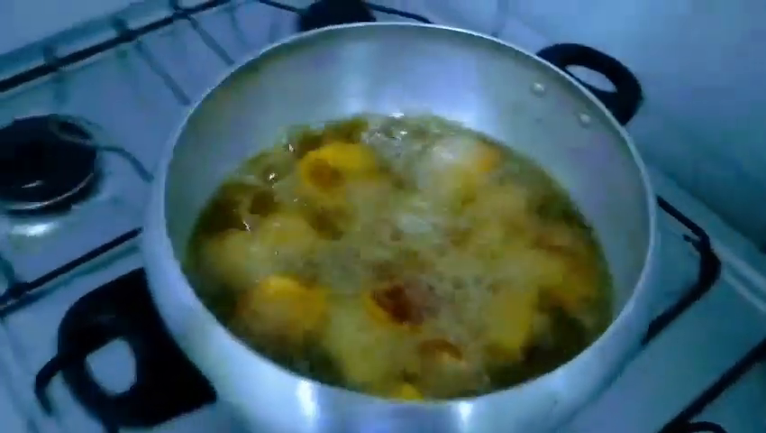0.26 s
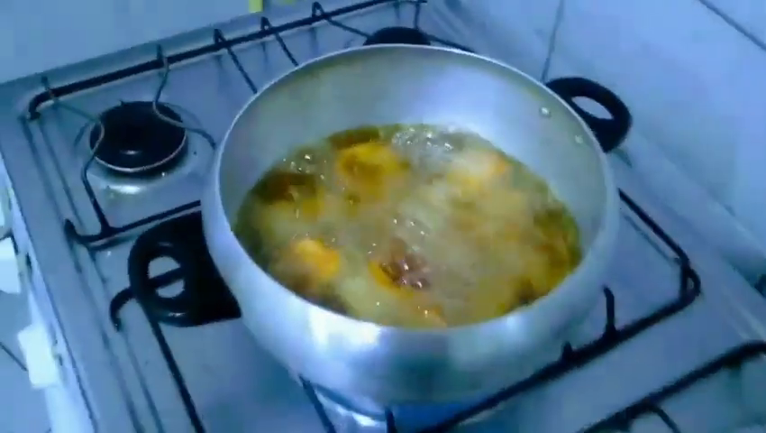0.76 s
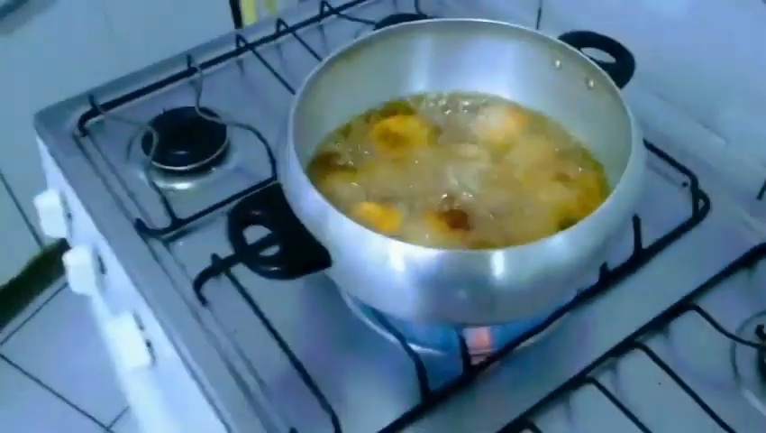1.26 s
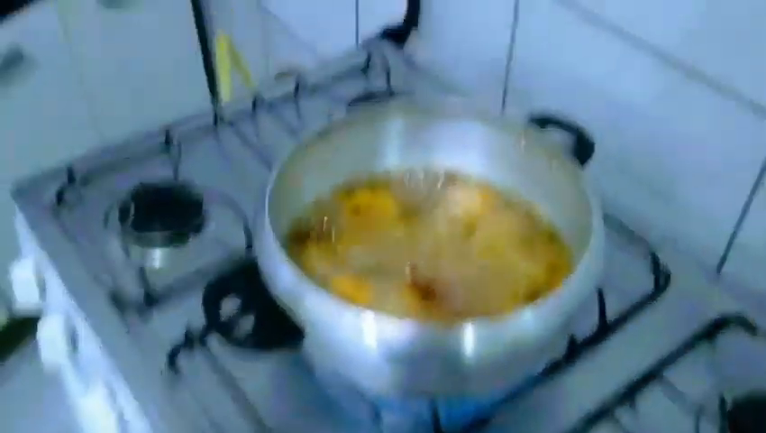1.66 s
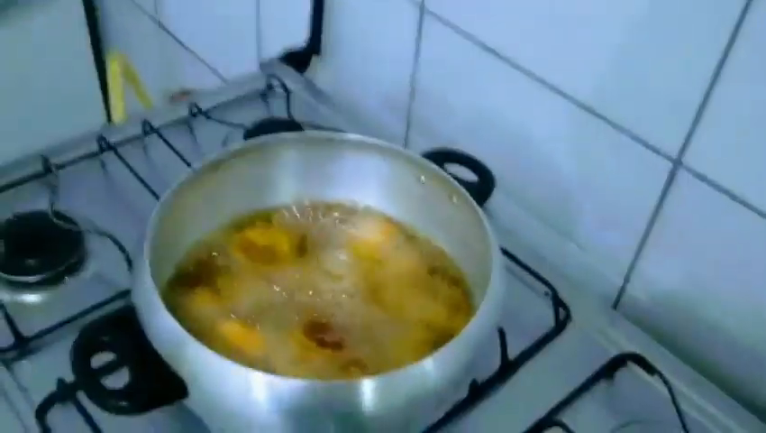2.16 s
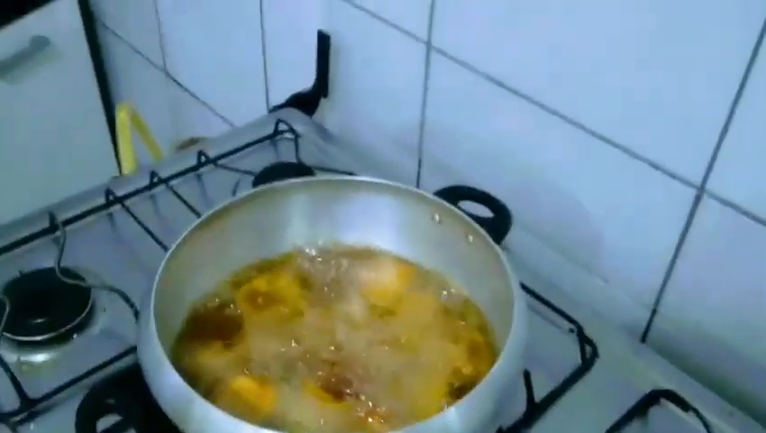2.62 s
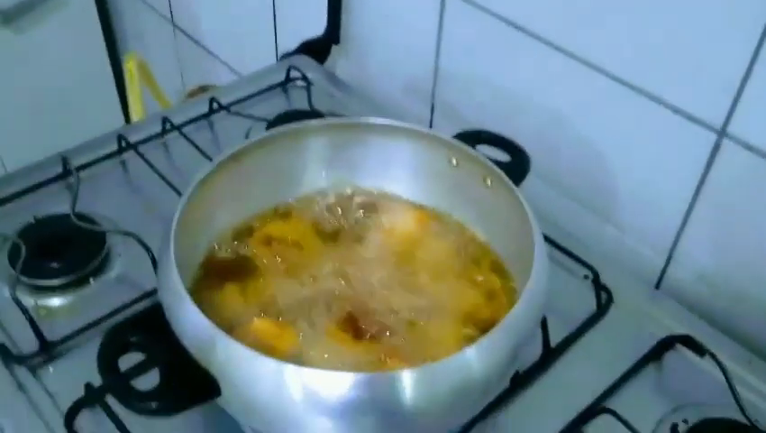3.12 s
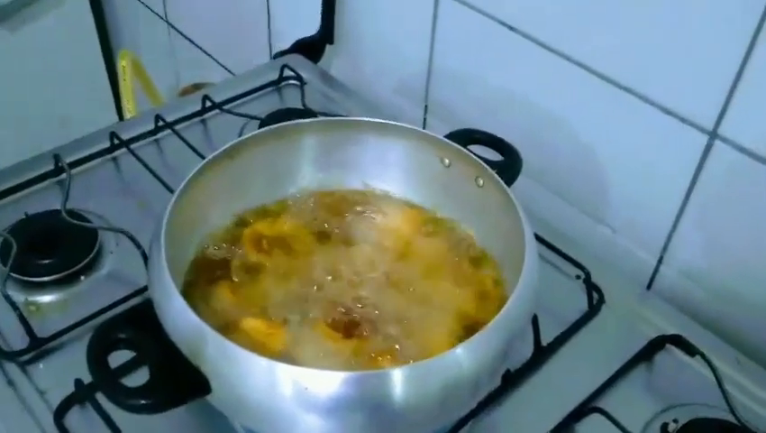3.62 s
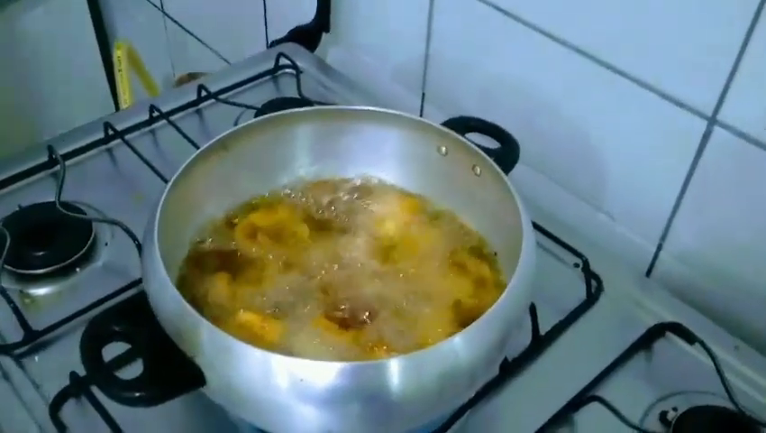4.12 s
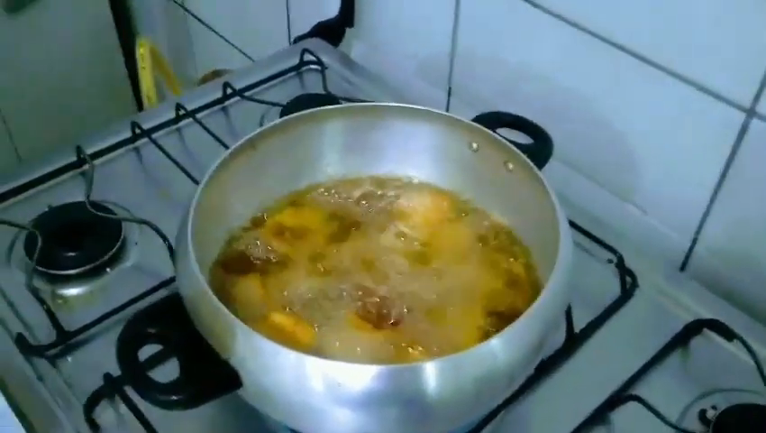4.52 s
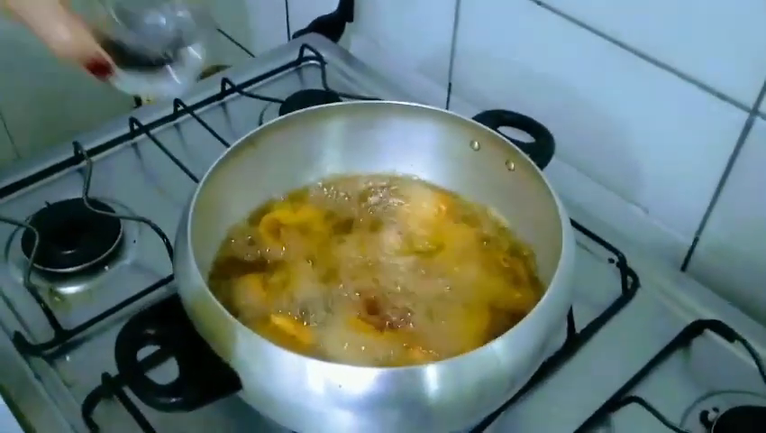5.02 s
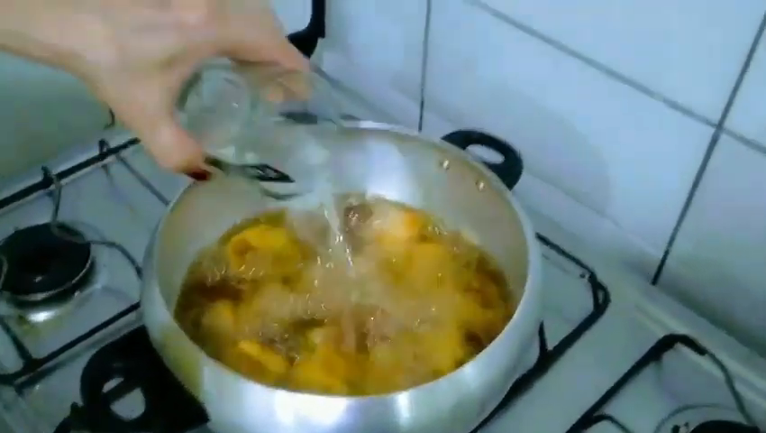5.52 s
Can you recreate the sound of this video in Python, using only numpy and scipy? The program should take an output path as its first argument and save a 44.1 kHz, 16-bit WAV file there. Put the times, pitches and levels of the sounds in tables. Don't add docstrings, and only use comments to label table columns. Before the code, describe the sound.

A wide metal pot of hot oil sizzles continuously: dense bright fizz, scattered sharp pops and low hollow gurgles. A small metal jingle and handling bumps come at the start, then a short wavering hum from a steam pocket. Bubbling is busiest early and thins later, before poured water hisses at the end. Tiled kitchen, handheld phone, wide stereo.

```python
import sys
import numpy as np
from scipy import signal
from scipy.fft import rfft, irfft, next_fast_len
from scipy.io import wavfile
from scipy.ndimage import map_coordinates

SR = 44100
rng = np.random.default_rng(int(sys.argv[2]) if len(sys.argv) > 2 else 0)


def store_wav(level_fs):
    pcm = np.round(np.clip(np.atleast_2d(level_fs), -1, 1) * 32767)
    wavfile.write(sys.argv[1], SR, pcm.T.astype(np.int16))


def makeup_ratio(level_db):
    decades = np.asarray(level_db, float) / 20
    return 10 ** decades


N = 254592


def unit(x):
    return x / np.sqrt(np.mean(x ** 2) + 1e-20)


def along(points, hz):
    f, v = np.transpose(points)
    return np.interp(np.log(hz + 1), np.log(f + 1), v)


def curves(rows):
    s, *cols = np.transpose(rows)
    return [np.interp(np.arange(N) / SR, s, c) for c in cols]


def wobble(rate):
    knots = rng.standard_normal(int(N * rate / SR) + 4)
    return map_coordinates(knots, [np.arange(N) * rate / SR])


def filtered(x, response):
    m = next_fast_len(N + 8192)
    return irfft(rfft(x, m) * response(np.fft.rfftfreq(m, 1 / SR)), m)[..., :N]


def coloured(x, colour):
    return unit(filtered(x, lambda hz: makeup_ratio(along(colour, hz))))


# f/Hz, likeness [-1 to 1]
PORT_LIKENESS = [(100, 0.64), (300, 0.8), (700, 0), (1300, 0.91), (1900, 0), (4000, -.15)]


def rush():
    def mid_and_side(hz):
        turn = np.arccos(np.clip(along(PORT_LIKENESS, hz), -1, 1)) / 2
        return np.array([np.cos(turn), np.sin(turn)])
    mid, side = filtered(rng.standard_normal((2, N)), mid_and_side)
    return np.array([mid + side, mid - side])


def bursts(s, gain, hz, t60, lag, size, rise=0.12):
    snap = 0.04
    start = (s * SR).astype(int)
    places = (start[:, None] + np.arange(size + 16)).ravel()
    out = []
    for shift in (lag / 2, -lag / 2):
        t = np.maximum(np.arange(-16, size) / SR - shift[:, None], 0)
        u = t / t60[:, None]
        wave = np.sin(2 * np.pi * hz[:, None] * t * (1 + rise * np.minimum(u, 1)))
        wave *= gain[:, None] * makeup_ratio(-60 * u) * (1 - np.exp(-u / snap))
        out.append(np.bincount(places, wave.ravel(), N + size + 16)[16:N + 16])
    return np.array(out)


def swarm(count, hz, spread, turns, scatter_db, size):
    s, e, place = rng.random((3, count))
    pitch = hz * np.exp(spread * rng.standard_normal(count))
    gain = makeup_ratio(-scatter_db * np.log(1 - .985 * e))
    lag = 0.00028 * place - 5e-5
    return unit(bursts(s * N / SR, gain, pitch, turns / pitch, lag, size=size))


# f/Hz, level/dB rms
DRONE_TONES = [(146, -80), (205, -76.5), (240, -67)]
# t/s, level/dB
HAND_SHIFTS = [
    (0.0, -45.5),
    (0.47, -40),
    (5.55, -63),
]


def rumble():
    rest_db, fade_db_per_s, touch_s = -83, 136, 0.042
    lull_db, case_deep = 4, 0.04
    t = np.arange(N) / SR
    drone = 0
    for hz, db in DRONE_TONES:
        drone = drone + makeup_ratio(db - 1.0 + 2.5 * wobble(8.3)) * np.sin(2 * np.pi * hz * t + 1.6 * wobble(10))
    grip = makeup_ratio(rest_db + lull_db * wobble(6.03))
    for s, db in HAND_SHIFTS:
        grip = grip + np.clip((t - s) / touch_s, 0, 1) * makeup_ratio(db - fade_db_per_s * np.abs(t - s))
    noise = rng.standard_normal((2, N))
    case = filtered(noise, lambda hz: (case_deep + (hz / 150) ** 5) / (1 + (hz / 165) ** 7))
    return drone + grip * unit(case + 0.037 * case[::-1])


# f/Hz, level/dB
HUM_SPECTRUM = [(25, -2), (120, -0.5), (250, 5), (500, -4.5), (1500, -29), (2500, -4), (4000, -40)]


def room_hum():
    return makeup_ratio(-58.0 + 2 * wobble(6.1)) * coloured(rush(), HUM_SPECTRUM)


# f/Hz, t60/s
TILE_DECAY = [(300, 0.65), (2000, 0.84), (10000, 0.016)]


def kitchen(x):
    hz, t, z = signal.stft(rng.standard_normal((2, SR // 3)), SR, nperseg=256)
    dying = makeup_ratio(-60 * t / along(TILE_DECAY, hz)[:, None])
    tail = signal.istft(z * dying, SR, nperseg=256)[1]
    late = np.pad(x, ((0, 0), (130, 0)))
    return signal.fftconvolve(late, tail / np.linalg.norm(tail[0]), axes=1)[:, :N]


# t/s, level/dB, lean/dB (odd mode groups gain it, the others lose it)
METAL_SHAKES = [
    (0, 1.5, 2.5),
    (.049, -2, 8.5),
    (0.104, 3.5, 7.5),
    (.165, -2, 1.5),
]
# f/Hz of each mode, strongest first
METAL_MODES = [
    [7763, 8150],
    [9760, 10212, 10616],
    [11698, 11816, 11190],
    [13840, 13969],
    [14756, 15294, 15450],
]
METAL_LEVELS = [-41.5, -51, -43, -55, -48]


def jingle():
    rattle = 0.011
    stop_s = 0.245
    t, out = np.arange(SR // 2) / SR, np.zeros((2, N))
    ends = [row[0] for row in METAL_SHAKES[1:]] + [stop_s]
    signs = (-1) ** np.arange(len(METAL_MODES))
    for (s, db, lean_db), end in zip(METAL_SHAKES, ends):
        age = np.maximum(t - s, 0)
        swell = makeup_ratio(-60 * age / .5 - np.clip((t - end) * 900, 0, 80)) * (1 - np.exp(-age / 0.0013))
        for level, modes in zip(db + np.array(METAL_LEVELS) - lean_db * signs, METAL_MODES):
            for k, hz in enumerate(modes):
                wander = rattle * np.cumsum(rng.standard_normal(len(t))) * (hz / 12000) ** 2
                phase = rng.random() + 0.15 * rng.random((2, 1)) + wander
                ring = np.sin(2 * np.pi * (hz * age + phase))
                out[:, :len(t)] += makeup_ratio(level + 6.0 - 19 * np.sqrt(k)) * swell * ring
    return out


# t/s, f/Hz, level/dB
POCKET_HUM = [
    (.39, 379, -56),
    (.41, 385, -43),
    (.455, 442, -35),
    (.53, 341.3, -47),
    (.62, 402.6, -38),
    (.65, 392, -53),
    (.7, 400.3, -33),
    (.85, 386.6, -49),
    (.93, 383.5, -36),
    (.97, 373, -59),
]


def pocket():
    hz, db = curves(POCKET_HUM)
    t = np.arange(N) / SR
    alive = (t > POCKET_HUM[0][0]) & (t < POCKET_HUM[-1][0])
    turns = np.cumsum(hz + 14 * wobble(39.98)) / SR
    return alive * makeup_ratio(db + 4.5 * wobble(25.7)) * np.sin(2 * np.pi * turns)


# t/s, level/dB rms, length/s
WET_SPOTS = [
    (0.727, -42, 0.016),
    (1.935, -34.5, 0.07),
    (2.16, -32, 0.024),
    (2.777, -37, 0.03),
    (3.391, -32, 0.12),
    (3.712, -33, 0.19),
    (4.022, -28, 0.046),
    (4.75, -33, 0.024),
    (5.346, -38, 0.099),
    (5.645, -42, .09),
]
# f/Hz, level/dB
SPATTER_SPECTRUM = [(250, -42), (500, -3), (1500, 2), (2250, 20), (4500, 19.5), (7000, 7), (12000, -4.5),
                    (16000, -26)]


def spatter():
    t, level = np.arange(N) / SR, 0
    for s, db, length in WET_SPOTS:
        fall_db = 77 * np.maximum(t - s - length, 0) + 56 * np.abs(t - s)
        level = level + (t > s) * makeup_ratio(db - fall_db)
    bubbles = swarm(count=9000, hz=3030, spread=0.68, turns=18.0, scatter_db=13.0, size=200)
    return level * coloured(0.15 * bubbles + 3.5 * rush(), SPATTER_SPECTRUM)


def opening(rows, shut_db):
    open_s, sag_db_per_s, close_db_per_s = 0.0033, 4, 355
    power = np.pad(makeup_ratio(shut_db) ** 2, (0, 2 * SR))
    for s, length, db in rows:
        age = np.arange(int((length + .2) * SR)) / SR
        fall_db = sag_db_per_s * age + close_db_per_s * np.maximum(age - length, 0)
        power[int(s * SR):][:len(age)] += (np.minimum(age / open_s, 1) * makeup_ratio(db - fall_db)) ** 2
    return np.sqrt(power[:N])


# low edge f/Hz, high edge f/Hz, make-up level/dB, shut level/dB
GATE_BANDS = [
    (279, 466, 1, -66),
    (577, 728, -5, -54.5),
    (740, 984, -7, -50.5),
    (1051, 1300, -7.5, -50),
    (1257, 3170, 6.5, -69.5),
]
# t/s, length/s, level/dB
DEEP_BOILS = [
    (0.022, 0.019, -40.5),
    (0.11, 0.12, -42),
    (0.41, 0.545, -41),
    (0.988, 0.096, -47.5),
    (1.288, 0.071, -47),
    (2.076, 0.21, -45.5),
    (2.428, 0.07, -49.5),
    (3.04, 0.017, -43.5),
    (4.016, 0.07, -48),
    (5.548, 0.016, -53),
]
LOW_BOILS = [(0.009, 0.056, -38.5), (0.121, 0.29, -38), (0.442, 0.18, -35.5), (0.96, 0.065, -34),
             (1.158, 0.02, -31), (1.496, 0.026, -43.5), (2.022, 0.13, -41.5), (2.244, 0.021, -38),
             (2.375, 0.073, -39), (2.562, 0.038, -39), (2.775, 0.042, -36.5), (2.865, 0.06, -41.5),
             (3.038, 0.02, -37), (3.224, 0.013, -38), (3.395, 0.072, -36), (3.541, 0.12, -39),
             (3.778, 0.032, -37.5), (4.035, 0.048, -39), (4.193, 0.039, -36.5), (4.565, 0.015, -40),
             (4.741, 0.034, -39), (4.99, 0.016, -39.5), (5.097, 0.048, -37.5), (5.209, 0.075, -46),
             (5.325, 0.077, -41), (5.545, 0.25, -40.5)]
MIDDLE_BOILS = [(0.103, 0.097, -37.5), (0.302, 0.042, -39), (0.51, 0.07, -36), (.74, 0.18, -43.5),
                (1.16, 0.077, -40.5), (1.356, 0.033, -34), (1.463, 0.089, -28), (1.714, 0.091, -31),
                (1.79, 0.11, -35), (1.976, 0.26, -32.5), (2.2, 0.034, -42), (2.374, 0.015, -40),
                (2.439, 0.019, -38), (2.541, 0.022, -36), (2.946, 0.014, -54), (3.395, 0.068, -37),
                (3.541, 0.025, -35), (4.04, 0.0083, -31), (4.84, 0.03, -38), (5.093, 0.045, -41),
                (5.197, 0.082, -37), (5.325, 0.066, -42), (5.423, 0.014, -33), (5.55, 0.23, -38),
                (2.78, .13, -45), (3.22, 0.024, -45), (4.5, 0.091, -40.5)]
HIGH_BOILS = [(0.049, 0.16, -37), (0.484, 0.23, -38.5), (0.743, 0.029, -33), (0.811, 0.17, -35),
              (0.975, 0.019, -26.5), (1.075, 0.079, -36.5), (1.166, 0.048, -33.5), (1.352, 0.86, -32),
              (1.712, 0.63, -35), (2.035, 0.17, -50), (2.264, 0.043, -37), (2.344, 0.14, -37),
              (2.697, 0.034, -35.5), (2.901, 0.021, -37), (3.039, 0.11, -39.5), (3.408, 0.013, -32),
              (3.52, 0.12, -36), (3.733, 0.14, -36.5), (4.076, 0.038, -36), (4.282, 0.17, -39),
              (4.809, 0.082, -46), (5.012, 0.011, -37), (5.098, 0.021, -32), (5.248, 0.037, -39),
              (5.329, 0.13, -37), (5.485, 0.34, -39), (2.6, 0.01, -34.5), (1.4, 0.081, -40),
              (4.56, 0.2, -45), (3.0, 0.018, -32.5), (4.8, 0.16, -33)]
MURMUR_BOILS = [(0.019, 0.29, -46), (0.297, 0.17, -54), (0.421, 0.29, -52.5), (0.748, 0.5, -53),
                (1.369, 0.059, -60), (1.507, 0.047, -46), (1.59, .7, -48.5), (2.38, 0.085, -51),
                (2.901, 0.037, -58), (3.033, 0.041, -51), (3.155, 0.026, -52.5), (3.518, 0.16, -57),
                (3.708, 0.086, -63), (4.017, 0.065, -48), (4.558, 0.055, -55), (4.837, 0.17, -54),
                (5.112, 0.017, -54), (5.497, 0.026, -40.5), (5.55, 0.3, -38.5)]


def boil():
    bubbles = swarm(count=2500, hz=883.4, spread=0.482, turns=30.3, scatter_db=1.5, size=1300)
    raw = 0.5 * bubbles + 1.43 * rush()
    shared_leak_db = 2 * wobble(8)
    boils = (DEEP_BOILS, LOW_BOILS, MIDDLE_BOILS, HIGH_BOILS, MURMUR_BOILS)
    out = 0
    for rows, (lo, hi, makeup_db, shut_db) in zip(boils, GATE_BANDS):
        band = filtered(raw, lambda hz: 1 / (1 + (lo / (hz + 1)) ** 24) / (1 + (hz / hi) ** 24))
        gate = opening(rows, shut_db + shared_leak_db + 1.2 * wobble(9.3))
        out = out + gate * makeup_ratio(makeup_db + 1.4 * wobble(16)) * unit(band)
    return out


# t/s, peak level/dB, f/Hz
GURGLE_BURSTS = [(0.141, -20, 920), (0.1809, -17, 750), (0.3108, -13.5, 757), (0.3318, -11, 1070),
                 (0.3849, -19, 740), (0.5189, -8, 1053), (0.5404, -18, 797), (0.563, -16, 1014),
                 (0.63, -12, 1207), (0.8204, -15, 1147), (0.8549, -8.5, 1140), (0.8742, -20, 1136),
                 (0.9898, -8.5, 1056), (1.0826, -11, 1255), (1.303, -9, 1110), (1.3697, -11.5, 1047),
                 (1.4883, -7, 820), (1.512, -4, 797), (1.5262, -15, 980), (1.7216, -3, 1016),
                 (1.7441, -5, 1030), (1.8, -9.5, 1060), (1.812, -13, 807), (1.842, -13.5, 798),
                 (1.885, -13.5, 1017), (2.0629, -12, 1165), (2.0761, -13, 1020), (2.307, -22, 1140),
                 (2.3534, -10, 1374), (2.3847, -17, 870), (2.4639, -24, 1060), (2.704, -26, 1210),
                 (2.725, -8.5, 1240), (2.9526, -15.5, 792), (3.0435, -18.5, 1140), (3.0823, -17.5, 1054),
                 (3.4132, -12, 760), (3.526, -13.5, 1244), (3.5489, -15, 824), (3.6211, -17, 1080),
                 (3.743, -12.5, 1310), (3.7995, -13.5, 1094), (3.903, -15, 1090), (3.9213, -11, 1124),
                 (4.0835, -10, 1275), (4.1995, -17, 707), (4.29, -14.5, 1200), (4.3598, -16.5, 1220),
                 (4.502, -19.5, 986), (4.7577, -17.5, 1155), (4.8457, -16, 1113), (4.948, -16, 1180),
                 (5.002, -17.5, 740), (5.1009, -21, 840), (5.1234, -13.5, 927), (5.254, -11.5, 907),
                 (5.3337, -13.5, 758), (5.3463, -12.5, 1120), (5.4303, -21.5, 854), (5.545, -31, 262),
                 (5.5652, -16, 940), (5.5919, -13, 994)]
# t/s, peak level/dB, f/Hz
EARLY_DULL = [(0.0643, -25, 3650), (0.093, -21.5, 3580), (0.1812, -24, 3730), (0.3069, -26, 3630),
              (0.3526, -20, 3700), (0.3828, -16, 3830), (0.4301, -24, 3700), (0.4872, -14.5, 3600),
              (0.5193, -21.5, 3600), (0.5307, -19, 3650), (0.5434, -17, 3720), (0.5657, -11, 3850),
              (0.638, -17.5, 3190), (0.6703, -18.5, 3680), (0.6837, -15, 3660), (0.7531, -11, 3596),
              (0.7682, -8, 3480), (0.782, -20, 3640), (0.7891, -15, 3740), (0.814, -14, 3720),
              (0.8784, -13.5, 3770), (0.9067, -21, 3500), (0.9927, -22, 3550), (1.0543, -16, 3700),
              (1.1138, -23, 3550), (1.1364, -19, 3960), (1.1425, -25, 3540), (1.1766, -21.5, 3160),
              (1.2147, -19, 3840), (1.2329, -20, 3700), (1.2605, -17, 4000), (1.2757, -13.5, 3850),
              (1.3186, -14, 3950), (1.3373, -18, 3900), (1.3456, -21.5, 3300), (1.3837, -24.5, 3500),
              (1.4313, -27, 3650), (1.5217, -18, 2950), (1.7193, -23, 3580), (1.7343, -23, 3470),
              (1.7486, -15, 3740), (1.7603, -25, 3580), (1.9414, -18, 3660), (2.0617, -22, 3330),
              (2.1676, -12, 3280), (2.1814, -31, 3210), (2.3584, -21.5, 4060), (2.3814, -27, 3370),
              (2.441, -22, 4040), (2.4582, -18, 4060), (2.5462, -20.5, 3900)]
LATE_DULL = [(2.606, -23, 3220), (2.657, -25, 3330), (2.6912, -20.5, 3700), (2.7835, -19, 3600),
             (2.8093, -26, 3580), (2.9404, -27, 3880), (2.9824, -24, 2740), (3.0027, -20, 4160),
             (3.0454, -23, 3300), (3.057, -25, 3500), (3.133, -23.5, 3180), (3.1823, -20.5, 2700),
             (3.1921, -30, 3100), (3.2283, -16.5, 4000), (3.2344, -25, 3770), (3.3886, -20, 3020),
             (3.434, -22.5, 3030), (3.5052, -21.5, 3300), (3.7137, -23.5, 2900), (3.747, -18, 3700),
             (3.7546, -24, 3600), (3.848, -22, 3270), (3.8967, -22.5, 3600), (3.931, -22, 3870),
             (4.025, -17, 2800), (4.0669, -20, 3600), (4.1375, -27, 3310), (4.365, -27, 3700),
             (4.5461, -23.5, 3500), (4.658, -24.5, 2970), (4.6918, -21.5, 3030), (4.7112, -18, 3550),
             (4.7595, -21, 3200), (4.776, -30, 3690), (4.7993, -16, 2780), (4.9004, -25, 3650),
             (4.9814, -20, 4060), (4.992, -19, 4170), (5.031, -23.5, 3530), (5.094, -28, 3280),
             (5.2906, -27, 2880), (5.328, -24, 4300), (5.3391, -29, 3780), (5.3508, -17.5, 3760),
             (5.404, -25, 3430), (5.455, -25, 3860), (5.5282, -22, 2940), (5.645, -17.5, 3500),
             (5.6971, -22, 3220)]
# t/s, peak level/dB, f/Hz
EARLY_BRIGHT = [(0.3571, -22, 5700), (0.368, -17.5, 5050), (0.3944, -24.5, 5340), (0.4333, -18.5, 5350),
                (0.512, -21, 5480), (0.6246, -22, 5660), (0.671, -19, 4800), (0.7539, -14, 5110),
                (0.7621, -26, 5600), (0.7897, -24, 5750), (0.827, -22, 5600), (0.849, -27, 5650),
                (0.964, -20, 5870), (0.974, -20, 5300), (1.0986, -21, 5550), (1.1476, -21, 5930),
                (1.1732, -18.5, 5000), (1.1799, -15.5, 5400), (1.3185, -22, 5550), (1.3457, -17, 5450),
                (1.4742, -16.5, 5300), (1.52, -21, 5470), (1.608, -19, 5200), (1.72, -18, 5200),
                (1.855, -18.5, 5400), (1.9644, -19.5, 5630), (1.9998, -14.5, 6600), (2.0157, -16.5, 6200),
                (2.1805, -29, 5530), (2.2403, -18.5, 5300), (2.2806, -25, 5720), (2.288, -15.5, 5700),
                (2.3158, -17.5, 5100), (2.4715, -20.5, 5800), (2.579, -17.5, 6700), (2.6072, -20, 5300),
                (2.66, -23, 5700)]
LATE_BRIGHT = [(2.8057, -22, 5230), (2.9404, -26.0, 5400), (3.1435, -19.5, 5500), (3.235, -20, 5670),
               (3.2882, -24, 5170), (3.385, -22, 6060), (3.4003, -23, 5900), (3.5329, -20.5, 5730),
               (3.579, -24, 6000), (3.5998, -22, 5660), (3.6319, -15, 5580), (3.6478, -21, 5850),
               (3.714, -23, 5530), (3.7394, -20, 5500), (3.747, -18, 5700), (3.8004, -17, 6040),
               (3.823, -23, 5430), (3.8678, -22, 5170), (3.9254, -16.5, 4970), (3.943, -23, 5900),
               (4.1353, -13.5, 6230), (4.369, -17.5, 6030), (4.4784, -19.5, 5200), (4.537, -21, 5650),
               (4.637, -16, 5800), (4.652, -31, 5650), (4.667, -19, 5900), (4.6971, -21, 5600),
               (4.7264, -26, 5800), (4.7503, -20, 5630), (4.7996, -20.5, 5830), (4.9055, -12, 6110),
               (5.06, -19, 5760), (5.142, -21.5, 5830), (5.207, -27, 5750), (5.225, -24.5, 5650),
               (5.295, -25, 5650), (5.3603, -26, 5400), (5.4147, -19, 5500), (5.4243, -28, 5520),
               (5.483, -22, 5990)]


def pops():
    s, db, hz = np.vstack([EARLY_DULL, LATE_DULL, EARLY_BRIGHT, LATE_BRIGHT]).T
    place, delay, detune = rng.random((3, len(s)))
    lag = np.round(0.00028 * place * hz) / hz
    main = bursts(s, makeup_ratio(db + 5), hz, 22 / hz, lag, size=700, rise=0.028)
    other = hz * (.85 + .3 * detune)
    neighbour = bursts(s + 0.001868 * delay, makeup_ratio(db - 6), other, 14 / other, 0.00034 * place, size=700)
    s, db, hz = np.transpose(GURGLE_BURSTS)
    gurgles = bursts(s, makeup_ratio(db - 10.5), hz, 35 / hz, 0 * s, size=3500, rise=0.0017)
    return main + neighbour + gurgles


def swell_after(rows):
    spray_db, die_s = -9, 0.0033
    s, db, _ = np.transpose(rows)
    kicks = np.bincount((s * SR).astype(int), makeup_ratio(db + spray_db) ** 2, N)
    dying = np.exp(-2 * np.arange(SR // 10) / SR / die_s)
    return np.sqrt(np.abs(signal.fftconvolve(kicks, dying)[:N]))


# t/s, level/dB
WATER_POUR = [
    (5.5, -69),
    (5.53, -44.5),
    (5.77, -45.5),
]
# f/Hz, level/dB
STEAM_SPECTRUM = [(600, -27), (3000, 10.5), (6000, 13.5), (7500, 11.5), (9000, 8.5), (12000, 1),
                  (13200, -2.5), (14300, 3), (16000, -11)]


def steam(fizz_db, spurts):
    t, (pour_db,) = np.arange(N) / SR, curves(WATER_POUR)
    mist = swarm(count=12000, hz=11570, spread=0.166, turns=60.0, scatter_db=3, size=80)
    hiss = coloured(0.52 * mist + 0.6 * rush(), STEAM_SPECTRUM)
    learn_db = 17 * np.exp(-t / 0.13)
    idle_db = -49 + 0.58 * (fizz_db - fizz_db.mean()) + learn_db
    flash = (t > WATER_POUR[0][0]) * makeup_ratio(pour_db + 10.5)
    level = np.hypot(makeup_ratio(idle_db + 0.6 * wobble(30)), flash)
    return level * makeup_ratio(0.38 * spurts) * hiss


# f/Hz, level/dB
FIZZ_SPECTRUM = [(1400, -53), (2100, -10.5), (2800, 3), (4000, 7.5), (5500, 5.5), (7000, 4.5), (8500, -5.5),
                 (11000, -13.5), (15000, -24)]


def fizz(fizz_db, spurts):
    bubbles = swarm(count=5000, hz=5080, spread=0.358, turns=30.0, scatter_db=1.4, size=200)
    crackle = coloured(0.47 * bubbles + 1.02 * rush(), FIZZ_SPECTRUM)
    dull = filtered(crackle, lambda hz: hz < 4600)
    common = wobble(45)

    def stir(rows):
        flicker_db = 1.4 * (common + wobble(40))
        return np.hypot(makeup_ratio(fizz_db + 3.0 + 0.3 * spurts + flicker_db), swell_after(rows))
    dull_level = stir(np.vstack([EARLY_DULL, LATE_DULL]))
    bright_level = stir(np.vstack([EARLY_BRIGHT, LATE_BRIGHT]))
    return dull_level * dull + bright_level * (crackle - dull)


# t/s, level/dB
OIL_HEAT = [(0, -38.5), (.3, -37), (.8, -36.5), (2.3, -37.5), (3.3, -39), (3.7, -38.5), (4.25, -40),
            (4.8, -38), (5.25, -43), (5.5, -39), (5.77, -32.5)]


def scene():
    (fizz_db,), spurts = curves(OIL_HEAT), wobble(20)
    single = pops()
    background = room_hum() + makeup_ratio(-12) * kitchen(single) + jingle() + pocket()
    return background + spatter() + boil() + single + steam(fizz_db, spurts) + fizz(fizz_db, spurts)


def top_cut(x):
    return signal.sosfilt(signal.butter(12, 16310, fs=SR, output="sos"), x)


# f/Hz, level/dB
PORT_BALANCE = [(300, -1.5), (2250, -2), (2800, -5.5), (3800, 4.5), (5500, -1.5), (9000, 1.5)]
# f/Hz, share [0-1]
RIGHT_FROM_LEFT = [(300, .62), (2250, .56), (2800, .35), (3800, .5), (5500, .15), (8000, .05)]
# f/Hz, share [0-1]
LEFT_FROM_RIGHT = [(300, .62), (2250, .6), (2800, .78), (3800, .45), (5500, .8), (8000, .6), (12000, .25)]


def record(dry):
    def right_over_left(hz):
        bass_lag = 0.28 / (1 + (hz / 500) ** 2)
        return makeup_ratio(along(PORT_BALANCE, hz)) * np.exp(-1j * bass_lag)

    def crossing(hz):
        share = np.array([along(RIGHT_FROM_LEFT, hz), along(LEFT_FROM_RIGHT, hz)])
        return share * np.exp(-2j * np.pi * hz * 0.000448)
    ports = filtered(dry, lambda hz: right_over_left(hz) ** np.array([[-.5], [.5]]))
    wide = ports - filtered(ports[::-1], crossing)
    wide = wide / (1 + np.abs(wide / .62) ** 4) ** (1 / 4)
    wide = filtered(wide, lambda hz: hz / (hz + 90) / (1 + (hz / 15250) ** 80))
    return top_cut(wide + rumble())


dry = scene()
out = record(dry)
store_wav(out)
```